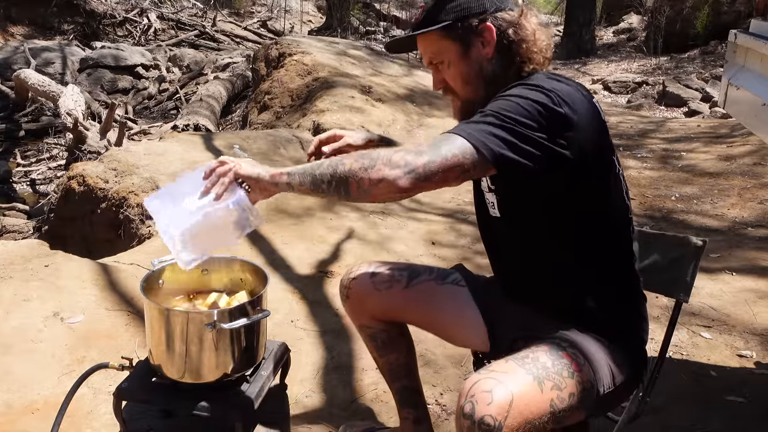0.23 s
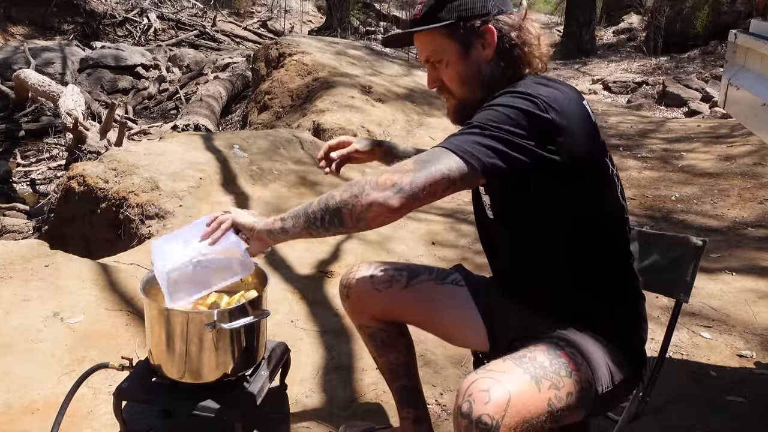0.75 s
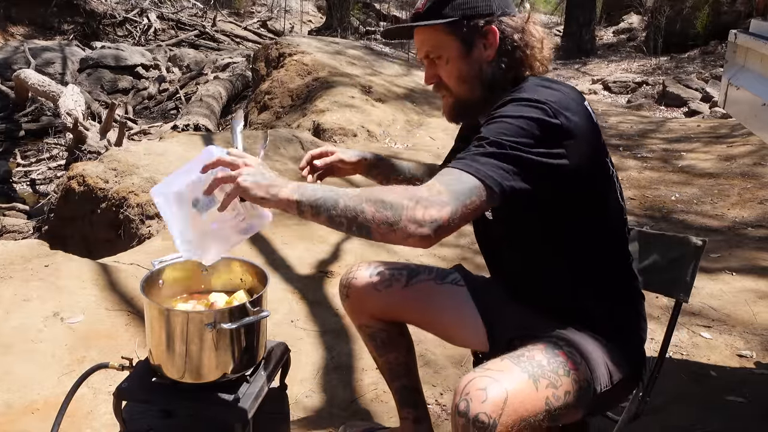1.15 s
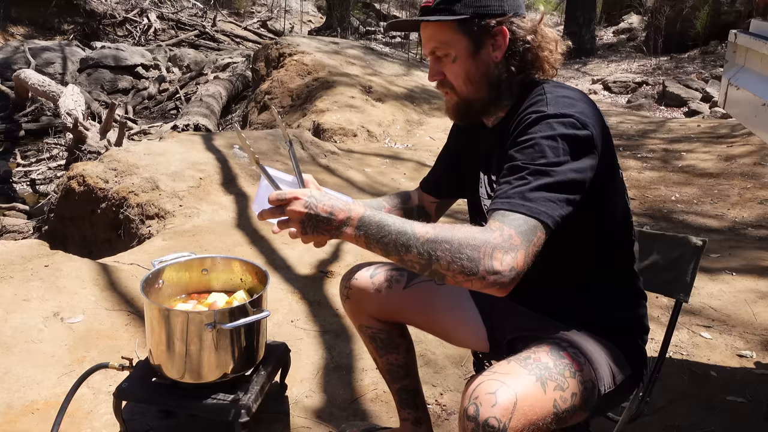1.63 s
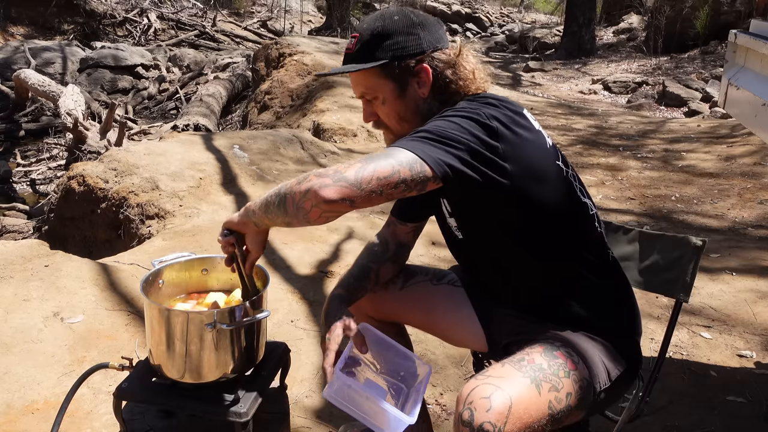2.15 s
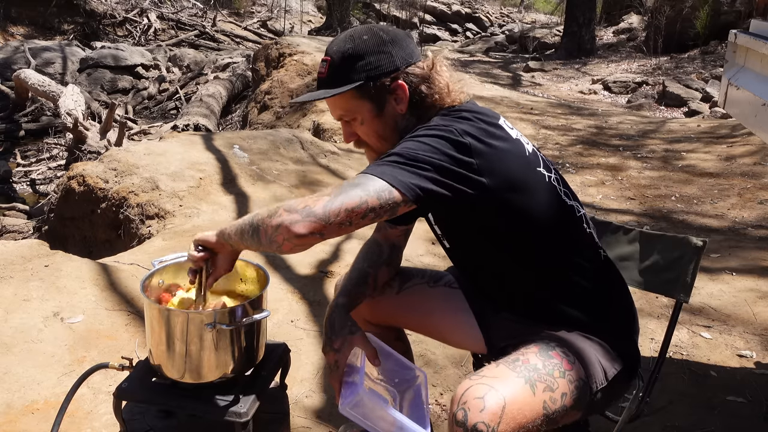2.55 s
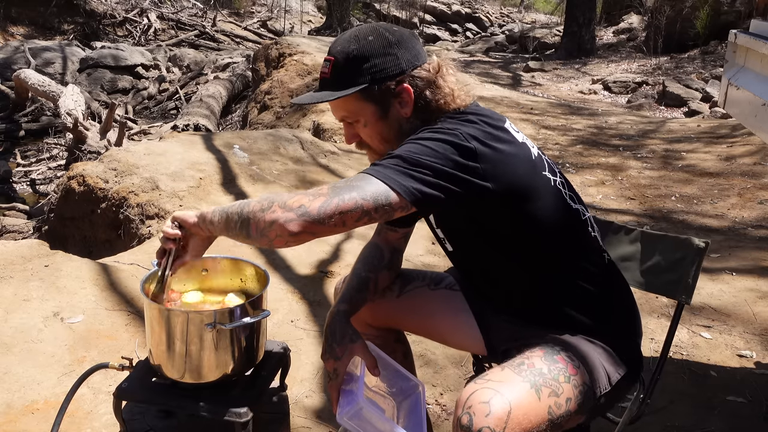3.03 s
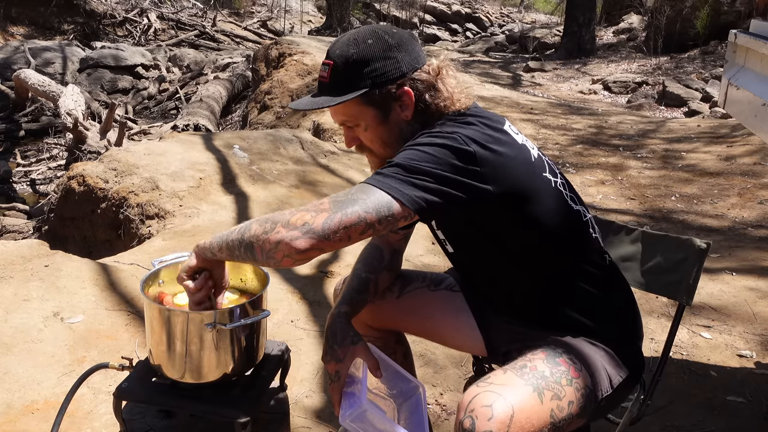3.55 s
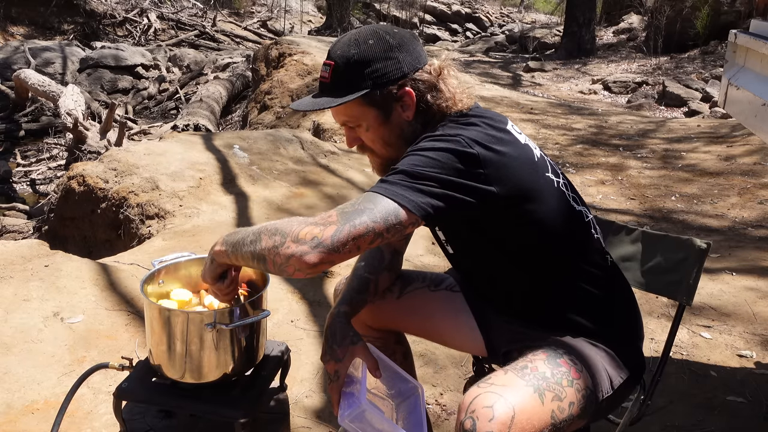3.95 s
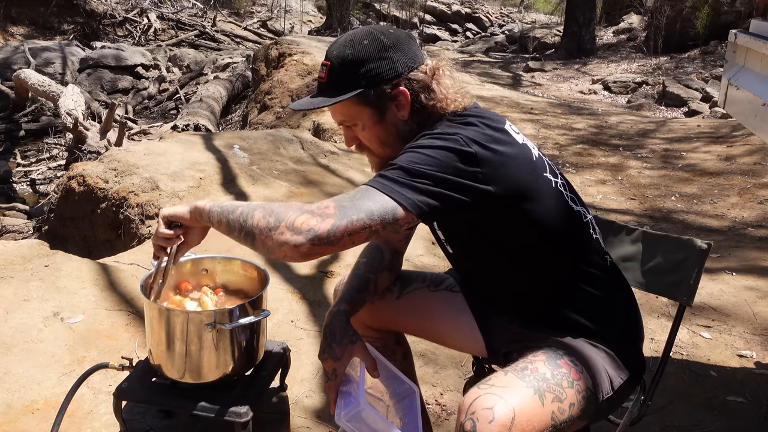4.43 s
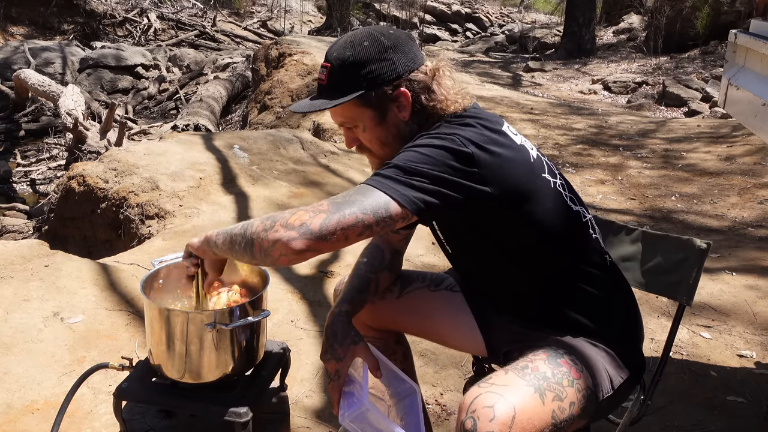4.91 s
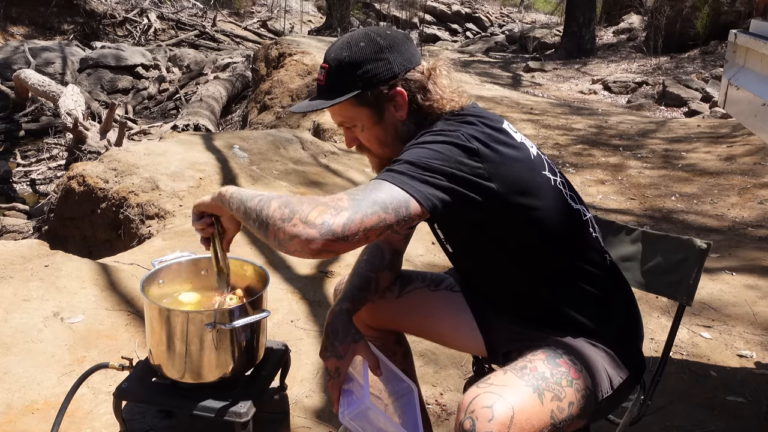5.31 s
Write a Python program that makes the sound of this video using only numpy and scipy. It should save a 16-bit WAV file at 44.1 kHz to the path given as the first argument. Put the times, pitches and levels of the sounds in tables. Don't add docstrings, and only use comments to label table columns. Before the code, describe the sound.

Close stereo sound at a dry outdoor camp, with almost no echo. Small plastic ticks and food scuffs come in the first 0.3 seconds. At 0.6 a tub corner rattles on a steel pot rim, then at 0.64 a hard knock rings the plastic with a short hollow boom; a softer, duller knock follows at 0.98. Light handling scuffs continue, with a faint bump at 1.7. Metal tongs clack on the pot wall at 2.14, with lesser taps to 2.4, again at 3.1, then a busy patch of scraping and ticking from 3.2 to 3.7. A bright, loud clack lands at 4.5, small drops plip around 4.85 to 5.05, and a last clack comes at 5.5. Throughout, a gas burner roars softly and flutters, strongest near 1.1, low wind rumbles and gradually eases, and to the right a cicada ticks and buzzes about six times a second over a faint high insect drone.

```python
import sys
import numpy as np
from scipy import signal
from scipy.fft import rfft, irfft
from scipy.io import wavfile
from scipy.ndimage import uniform_filter1d

SR = 44100
rng = np.random.default_rng(int(sys.argv[2]) if len(sys.argv) > 2 else 0)


def level_to_linear(level):
    exponent = np.asarray(level, float) / 20
    return 10 ** exponent


def transcribe(u):
    v = np.clip(np.atleast_2d(u).T, -1, 1)
    q = np.round(v * 32767).astype(np.int16)
    wavfile.write(sys.argv[1], SR, q)


N = 246078


def evened(x):
    return x / np.sqrt(np.mean(x ** 2) + 1e-20)


def peaked(x, db):
    return level_to_linear(db) * x / (abs(x).max() + 1e-20)


def read(points, hz):
    f, value = np.transpose(points)
    return np.interp(np.log(hz + 1), np.log(f + 1), value)


def curve(table, column):
    rows = np.array(table)
    return np.interp(np.arange(N) / SR, rows[:, 0], rows[:, column])


def add(mix, s, sound):
    part = mix[round(s * SR):][:len(sound)]
    part += sound[:len(part)]


def coloured(x, gain):
    return irfft(rfft(x) * gain(np.fft.rfftfreq(x.shape[-1], 1 / SR)), x.shape[-1])


def resonances(peaks):
    return lambda hz: sum(level_to_linear(db) / (1 + (2 * (hz - f) / w) ** 2) for f, w, db in peaks)


def blows(events, modes, spread_db, rough_db, crack_t60, shimmer_db, low_hz=250):
    # (frequency [Hz], density [dB per Hz])
    crack_spectrum = [(180, -31), (300, -8.5), (1530, -7.5), (2140, -4.5), (3030, -1.5), (4990, 0.5),
                      (6100, 2.5), (8090, -1.5), (16000, -15)]
    out, t = np.zeros(N), np.arange(8192) / SR
    hz, db, t60 = np.transpose(modes)[:, :, None]
    for s, peak_db, ring, crack_db, dull_db in events:
        spot, phase = rng.standard_normal((2, len(modes), 1))
        wobble = evened(uniform_filter1d(rng.standard_normal((len(modes), len(t))), size=70, axis=1))
        level_db = db + spread_db * spot + rough_db * wobble - 60 * t / (ring * t60)
        rise = np.minimum(hz * t / 4, 1)
        body = (level_to_linear(level_db) * rise * np.sin(2 * np.pi * hz * t + 2 * phase)).sum(0)

        snaps = np.exp(-(t % .0019) / 0.00019 - t / .002)
        chatter = rng.standard_normal(len(t)) * (0.35 + 3.2 * snaps)

        def contact(f):
            tilted = level_to_linear(read(crack_spectrum, f) - dull_db * np.log2(f + 400))
            return tilted / (1 + (low_hz / (f + 1)) ** 4)

        hiss = coloured(chatter, contact)
        shimmer = level_to_linear(shimmer_db - 60 * t / 0.23 + 3.8 * wobble[0])
        shimmer = shimmer * coloured(hiss, lambda f: 1 / (1 + (f / 7500) ** 3))
        crack = peaked(hiss * level_to_linear(-60 * t / (ring * crack_t60)) + shimmer, crack_db)
        onset = np.minimum(t / 0.00035, 1)
        add(out, s + 0.00037, peaked((peaked(body, 0) + crack) * onset, peak_db))
    return out


def tub_knocks():
    # (time [s], peak [dB], ring [factor on t60], crack [dB], dullness [dB per octave])
    knocks = [
        (.6373, -14, 1.01, -1, 1.6),
        (.9779, -23, .7, 1, 1.5),
        (.705, -33, .7, -4, 4.5),
        (1.681, -42, .5, -3, 5.5),
    ]
    # (frequency [Hz], level [dB], t60 [s])
    hard_modes = [(292, -11.5, 0.15), (740, 8, 0.018), (1060, -20.5, 0.21), (1135, 1, 0.043),
                  (1494, -7.5, 0.11), (1870, -20.5, 0.14), (2150, -16, 0.042), (2610, -17, 0.082),
                  (3410, -29, 0.035), (6850, -7, 0.019), (4150, -32, 0.052), (7900, -25.5, 0.058),
                  (9200, -23, 0.052), (9850, -22.5, 0.063)]
    # (frequency [Hz], level [dB], t60 [s])
    soft_modes = [(248, -1, 0.088), (774, 7, 0.025), (1143, 1.5, 0.04), (1500, -1, 0.038),
                  (1800, -10.5, 0.054), (2115, -15, 0.061), (2656, -17, 0.12), (3260, -20, 0.052),
                  (4460, -17, 0.023), (6450, -9.5, 0.032), (7500, -16, 0.035)]
    tub = blows(knocks[:1], hard_modes, spread_db=0.0, rough_db=3.5, crack_t60=0.08, shimmer_db=-20)
    tub += blows(knocks[1:], soft_modes, spread_db=.7, rough_db=3.0, crack_t60=0.06, shimmer_db=-18)
    return coloured(tub + booms(), lambda f: 1 / (1 + (150 / (f + 1)) ** 4))


def booms():
    # (time [s], peak [dB], frequency [Hz], t60 [s], stilled after [s])
    swings = [(.6409, -8.5, 466, .04, .03), (.6495, -20, 464, .2, .016), (.9818, -17, 478, .13, .011),
              (.6415, -24, 590, .08, .025), (.6378, -19, 1040, .06, .03), (.979, -44, 1486, .12, .03),
              (.672, -32, 470, .06, .02), (.707, -33, 460, .04, .02), (.999, -39, 500, .05, .012),
              (1.683, -44, 310, .06, .02)]
    out, t = np.zeros(N), np.arange(4096) / SR
    for s, peak_db, hz, t60, stilled in swings:
        hand = np.minimum(t / .0006, 1) / (1 + np.exp((t - stilled) / .002))
        add(out, s, peaked(-np.sin(2 * np.pi * hz * t) * level_to_linear(-60 * t / t60) * hand, peak_db))
    return out


def rim_glances():
    # (time [s], peak [dB], ring [factor on t60], crack [dB], dullness [dB per octave])
    glances = [
        (.5976, -19, .9, 4, .3),
        (.5997, -17, .9, 3, .5),
        (.613, -27, 1.2, 3, 3.5),
        (.618, -26, 1.01, 3, 2.5),
        (.629, -31, 1.01, -3, 1.5),
    ]
    # (frequency [Hz], level [dB], t60 [s])
    rim = [(1000, -4, 0.036), (1466, -16, 0.33), (1740, -9.5, .06), (2115, -1.5, 0.02), (2630, -9, 0.047),
           (3470, -12.5, 0.036), (4540, 1, 0.021), (5150, -21, .06), (5870, -11, .06), (6650, 5, 0.029),
           (7330, -5, 0.06), (8100, -13, 0.044), (9840, -11, 0.032), (11720, -20, 0.054)]
    return blows(glances, rim, spread_db=1.0, rough_db=3.0, crack_t60=0.07, shimmer_db=-11)


def tong_clacks():
    # (time [s], peak [dB], ring [factor on t60], crack [dB], dullness [dB per octave])
    clacks = [(2.1442, -16.5, 0.98, 1.5, 1.5), (2.1628, -25.5, 0.63, -6, -1), (2.2342, -27.5, 1.1, 12, 6),
              (2.372, -26, 0.77, 7, 0), (3.086, -21, 0.86, 1, 0.5), (3.412, -31, 1.2, 12, 4),
              (4.4805, -12.5, 0.87, 7, -4), (4.4967, -26.5, 0.74, 12, 3), (5.515, -15.5, 0.65, 5, -4.5),
              (5.5325, -25.5, 0.95, 8, 2)]
    landings = [0, 0, 0, 0, 1, 1, 2, 2, 3, 3]
    # (frequency [Hz], level [dB], t60 [s])
    first = [(730, -12, 0.062), (2126, -3.5, 0.043), (2570, -13, 0.045), (3435, -11, 0.028),
             (3890, -3.5, 0.028), (4400, -6, .02), (4840, 5, 0.013), (5300, 0.5, 0.018),
             (5900, -9.5, 0.034), (6940, -4, 0.02), (7700, -3, 0.023), (8100, -7, 0.02), (8570, -4, 0.036),
             (12050, -14, 0.014)]
    second = [(2160, -5, 0.03), (2412, -7, 0.028), (3350, -9.5, .02), (3790, -4.5, 0.035), (4400, 1, 0.02),
              (4730, -0.5, 0.023), (5090, -6, 0.034), (5550, 1, 0.021), (6230, -6, 0.027),
              (6780, -13, 0.04), (7330, -6, 0.022), (8260, -10, 0.03), (11400, -7, 0.012),
              (13100, -13, 0.013)]
    third = [(707, -11.5, 0.019), (1113, -29.5, 0.057), (2164, -8.5, 0.044), (2580, -30, 0.045),
             (4400, -5, 0.025), (4960, 0, 0.014), (5380, -5.5, 0.019), (5270, -18, 0.029), (6500, -8, 0.03),
             (6900, -14, 0.033), (7300, -24, 0.072), (8030, -11, 0.025), (8800, -16, 0.025),
             (9270, -25, 0.031)]
    fourth = [(409, -16, 0.056), (730, -15, 0.065), (1070, -24, 0.036), (2102, 0.5, 0.041),
              (2720, -33, 0.041), (3160, -22, 0.12), (3650, -10.5, 0.039), (4640, -1.5, 0.029),
              (6000, -13, 0.051), (6500, 0.5, 0.018), (7770, 0.5, 0.022), (8100, -23, 0.025),
              (8800, -8, 0.021), (9070, -8.5, 0.028)]
    out = np.zeros(N)
    for clack, spot in zip(clacks, landings):
        wall = (first, second, third, fourth)[spot]
        out += blows([clack], wall, spread_db=.7, rough_db=2.6, crack_t60=0.028, shimmer_db=-9, low_hz=1550)
    return out


def ticks():
    # (time [s], peak [dB], centre [Hz])
    scuffs = [(.051, -34, 3800), (.11, -45, 2500), (.129, -46, 1800), (.188, -37, 2600), (.2, -41, 3800),
              (.26, -45, 1100), (.5, -39, 2000), (.61, -33, 300), (.6374, -20, 1400), (.963, -44, 2500),
              (.978, -32, 300), (1.1295, -44, 1800), (1.2453, -48, 900), (1.3726, -41, 3000),
              (1.682, -48, 890), (1.7642, -38.5, 1900), (1.794, -44, 1300), (1.93, -48, 2000),
              (3.186, -46, 1600), (3.4, -46, 580), (3.64, -33, 2600), (3.657, -35, 2500),
              (4.8444, -37, 1040), (4.9048, -46, 1210), (5.517, -36.5, 520)]
    # (time [s], peak [dB], centre [Hz])
    dry_ticks = [(0.06, -50, 8850), (0.108, -36, 4860), (0.128, -50, 1800), (0.14, -42.5, 2600),
                 (.101, -49, 7500), (0.202, -38.5, 1840), (0.341, -45, 5900), (0.352, -44, 5500),
                 (.62, -49, 8100), (2.3028, -38.5, 4130), (2.3255, -51, 5240), (2.423, -42, 1000),
                 (2.4622, -37, 4900), (3.233, -40, 5430), (3.257, -38, 6150), (3.35, -40, 4200),
                 (3.499, -39, 4600), (3.534, -43, 4270), (3.552, -39, 4500), (3.604, -43, 4400),
                 (3.147, -50, 7500), (3.3808, -47, 1400), (3.419, -40, 4500), (3.478, -43, 6500),
                 (3.682, -44.5, 694), (4.511, -46, 730), (5.001, -43, 4130)]
    # (time [s], peak [dB], centre [Hz])
    taps = [(2.445, -43, 6300), (2.213, -60, 4800), (0.05, -21.5, 4400), (2.459, -47, 1270),
            (0.245, -42.5, 1780), (.2594, -49, 2190), (1.821, -46, 1620), (1.895, -39.5, 670),
            (2.3902, -40, 4370), (3.16, -52, 2650), (3.245, -50, 2500), (2.332, -48, 2800),
            (2.312, -47, 5200), (3.1767, -41, 6600), (3.2096, -40, 6200), (3.456, -42, 2720),
            (3.501, -43.5, 1500), (3.563, -36, 5200), (3.582, -34, 5460), (3.6226, -44, 4800),
            (3.627, -34, 4960), (3.865, -42, 4620), (4.526, -40, 4930), (4.6985, -45.5, 5240),
            (5.026, -45, 3800), (5.093, -43.5, 6300), (5.094, -45, 3560)]
    # (time [s], peak [dB], centre [Hz])
    snaps = [(2.294, -50, 12000), (2.464, -46, 12000), (3.257, -46, 12500), (0.0769, -24.5, 11000),
             (.141, -50, 11000), (.19, -41, 10000), (4.369, -48, 10840), (4.447, -44, 11000),
             (5.197, -45, 11500), (5.404, -47, 10500), (5.468, -48, 10500), (5.568, -46, 11500),
             (.199, -44, 12500), (2.164, -38, 12500), (5.311, -50, 12000)]
    # (time [s], peak [dB], centre [Hz])
    pricks = [(.0065, -36.5, 3000), (.6376, -17, 4000), (.9782, -28, 5000), (.3425, -40, 5000),
              (1.2465, -43, 3000), (2.462, -40, 5000), (3.082, -48, 4700), (0.051, -26.5, 7500),
              (0.0577, -31, 9000), (.0625, -34, 8000), (0.1774, -36, 6000), (0.1876, -32, 5000),
              (0.5015, -50, 3020), (.312, -56, 9000), (.457, -57, 9500), (1.246, -55, 1500),
              (3.4112, -36, 6860), (3.425, -39, 6500), (3.475, -37, 4950), (3.5014, -42.5, 3500),
              (3.5555, -44, 5000), (3.5612, -35, 4170), (3.5812, -27, 5570), (3.597, -51, 7950),
              (3.6055, -38, 4500), (3.6362, -35, 7000), (3.6383, -29.5, 5130), (3.641, -32, 3570),
              (3.6435, -35, 4000), (3.648, -37, 4000), (3.6567, -38, 4000), (3.6623, -50, 3000),
              (3.674, -45, 4000), (4.235, -47.5, 4000), (2.303, -50, 7700), (2.43, -44, 5000),
              (2.493, -45, 3000), (.674, -40, 6500), (.266, -45, 4800), (4.5065, -37, 5000),
              (5.5215, -32, 4970), (5.442, -42, 7500), (3.257, -36, 6500), (3.177, -42, 4000),
              (2.455, -45, 5000), (.38, -47, 5000), (.1015, -44, 8000), (5.345, -46, 5800),
              (3.251, -45, 5500)]
    # (bandwidth [octaves], t60 [s])
    contacts = [
        (1, 0.065),
        (0.5, 0.046),
        (0.27, 0.039),
        (.42, 0.0048),
        (0.45, 0.013),
    ]
    out, t = np.zeros(N), np.arange(-64, 4032) / SR
    for events, (octaves, t60) in zip((scuffs, dry_ticks, taps, snaps, pricks), contacts):
        for s, peak_db, hz in events:
            fade = level_to_linear(-60 * t / t60) + 0.5 * np.exp(-t / 0.00068)
            burst = rng.standard_normal(len(t)) * fade * (t > 0)
            band = coloured(burst, lambda f: np.exp(-.5 * (np.log2((f + 1) / hz) / octaves) ** 2))
            add(out, s + .0005 + t[0], peaked(band, peak_db))
    return out


def rubbing():
    # (time [s], level [dB])
    rub = [(0.0, -50), (0.37, -59), (1.18, -61), (1.62, -63), (2.22, -57.5), (2.33, -53), (2.84, -61),
           (3.12, -63), (3.26, -54), (3.4, -52.5), (3.64, -47.5), (3.73, -54), (4.32, -65), (4.58, -57),
           (4.68, -62.5), (4.99, -56.5), (5.13, -60.5), (5.58, -83)]
    # (frequency [Hz], density [dB per Hz])
    grit = [(290, -60), (500, -49.5), (750, 4.5), (974, -3), (2160, 2), (2390, 2.5), (5470, 3),
            (8450, -0.5), (14700, -18), (16000, -16)]
    grains, t = np.zeros(N), np.arange(600) / SR
    for hz in np.geomspace(900, 9000, 16):
        slips = level_to_linear(2.9 * np.minimum(rng.exponential(1, N), 4)) * (rng.random(N) < 160 / SR)
        cycles = rng.uniform(2, 7)
        squeak = np.sin(2 * np.pi * hz * t) * np.exp(-t * hz / cycles)
        grains += signal.oaconvolve(slips, squeak)[:N] * np.sqrt(hz / cycles)
    pressure = evened(uniform_filter1d(rng.standard_normal(N), size=600))
    rough = .9 * evened(grains) + rng.standard_normal(N) * level_to_linear(2.2 * pressure)
    return level_to_linear(curve(rub, 1) - 4.5) * evened(coloured(rough, lambda f: level_to_linear(read(grit, f))))


def drips():
    # (time [s], peak [dB], bubble [Hz], rise [share], t60 [s])
    drops = [
        (4.85, -45, 990, 0.061, 0.057),
        (4.876, -38.5, 2250, 0.3, 0.042),
        (4.915, -48, 1230, 0.082, 0.027),
        (4.925, -48, 1164, 0.08, 0.028),
        (4.986, -48.5, 1520, 0.087, 0.024),
        (5.049, -54.5, 2470, 0.074, 0.066),
        (5.573, -48, 1850, 0.04, 0.015),
    ]
    out, t = np.zeros(N), np.arange(4096) / SR
    for s, peak_db, hz, rise, t60 in drops:
        turns = hz * (t + rise * t ** 2 / t60)
        envelope = level_to_linear(-60 * t / t60) * np.minimum(t / 0.00086, 1)
        add(out, s, peaked(np.sin(2 * np.pi * turns) * envelope, peak_db))
    return out


def clearing(x):
    t = np.arange(6000) / SR
    sparse = rng.random((2, len(t))) < .05
    echoes = rng.choice([-1., 1.], (2, len(t))) * sparse * level_to_linear(-60 * t / 0.045) * (t > .0006)
    tail = coloured(echoes, lambda f: (f / 2000 + 0.048) ** 0.1)
    return signal.fftconvolve(x[None], tail / np.linalg.norm(tail[0]), axes=1)[:, :N]


def burner():
    # (time [s], level [dB])
    breeze_curve = [(0, -49), (.28, -57.5), (.5, -60), (.75, -53), (.98, -53.5), (1.12, -46.5),
                    (1.55, -52.5), (1.72, -59), (1.86, -57), (1.93, -51), (2.3, -63), (2.45, -56.5),
                    (2.62, -64.5), (2.83, -60), (3.1, -63), (3.96, -69.5), (4.45, -64), (5.58, -75.5)]
    # (frequency [Hz], width [Hz], level [dB])
    air_space = [(573, 190, 5), (770, 158, 3), (358, 690, -9), (2090, 200, -12)]
    # (frequency [Hz], width [Hz], level [dB])
    stand = [(1430, 140, -1.5), (1234, 1200, -18)]
    flutter = evened(uniform_filter1d(rng.standard_normal(N), size=700))
    flame = rng.standard_normal((2, N))
    flame = (flame[0] + 0.29 * flame[:, ::-1]) * level_to_linear(3.06 * flutter)
    breeze = curve(breeze_curve, 1) + 58
    roar = level_to_linear(-59 + breeze) * evened(coloured(flame, resonances(air_space)))
    whistle = level_to_linear(-72.5 + 1.03 * breeze) * evened(coloured(flame, resonances(stand)))
    return roar + whistle


def cicada():
    # (frequency [Hz], width [Hz], level [dB])
    tymbal = [(8010, 430, 5.5), (8670, 350, 6.5), (6840, 590, 0), (4360, 550, -3.5)]
    # (frequency [Hz], width [Hz], level [dB])
    tick_body = [(7640, 1200, 6), (4500, 600, -1), (11200, 1800, -15.5)]
    clicks, buzz, sag, t = np.zeros(N), np.zeros(N), np.zeros(N), np.arange(7000) / SR
    swell = (1 - np.exp(-t / 0.00084)) * np.exp(-t / 0.06) * np.clip((t[-1] - t) / .03, 0, 1)
    for s, tick_db, buzz_db, delay in phrases():
        tick = rng.standard_normal(200) * np.exp(-t[:200] / 0.0011)
        tick = 0.35 * tick + 2.4 * (t[:200] == 0)
        add(clicks, s + .0005, level_to_linear(tick_db) * tick)
        add(clicks, s + delay, level_to_linear(tick_db - 5.0) * tick)
        add(buzz, s, level_to_linear(buzz_db) * swell)
        add(sag, s, 550 * np.exp(-t / .028))
    turns = np.cumsum(350 * (1 + 0.71 * uniform_filter1d(rng.standard_normal(N), size=300))) / SR
    pulsed = rng.standard_normal((2, N)) * (0.27 + np.exp(-(turns % 1) / 0.15))
    wide = pulsed[0] + 0.14 * pulsed[1] * np.array([[1], [-1]])
    song = signal.hilbert(coloured(wide, resonances(tymbal)))
    song = evened((song * np.exp(-2j * np.pi * np.cumsum(sag) / SR)).real)
    ticking = level_to_linear(12) * coloured(clicks, resonances(tick_body))
    return (ticking + buzz * song) * level_to_linear(np.array([[-4.5], [2.5]]))


def phrases():
    # (time [s], effort [dB])
    song = [(0.0112, -2.5), (0.506, -0.5), (0.8483, -4), (2.1524, -4.5), (2.811, -3), (3.3117, -4),
            (4.3042, -5.5), (4.9594, -5), (5.454, -5.5)]
    marked = [0, 3, 5, 13, 17, 20, 26, 30, 33]
    start, effort = (np.interp(np.arange(marked[-1] + 1), marked, c) for c in np.transpose(song))
    a, b, c = rng.standard_normal((len(start), 3)).T
    uneven_db = .8
    tick_db = -38 + 1.8 * effort + uneven_db * a
    buzz_db = -52 + effort + uneven_db * b
    return zip(start, tick_db, buzz_db, 0.022 * (1 + 0.21 * c))


def field(points, patchy_db, size):
    # (frequency [Hz], likeness [0-1])
    likeness = [(60, 0.28), (150, 0.66), (380, 0.51), (950, 0.073), (2380, 0.64), (5980, 0.98),
                (15000, 0.97)]
    frames, hz = 4 * N // size + 6, np.fft.rfftfreq(size, 1 / SR)
    a, b, c, d, patch = rng.standard_normal((frames, len(hz), 5)).T
    patch = evened(uniform_filter1d(uniform_filter1d(patch, size=10, axis=0), size=10, axis=1))
    same, left = np.clip(read(likeness, hz), -1, 1)[:, None], a + 1j * b
    right = same * left + np.sqrt(1 - same ** 2) * (c + 1j * d)
    z = np.array([left, right]) * level_to_linear(read(points, hz)[:, None] + patchy_db * patch)
    return evened(signal.istft(z, nperseg=size, noverlap=3 * size // 4)[1][:, :N])


def wind():
    # (time [s], level [dB])
    gusts = [(0.0, -63.5), (0.59, -65), (0.7, -62.5), (0.93, -68), (1.15, -59), (1.46, -60.5),
             (1.69, -68.5), (2.1, -65.5), (2.42, -70), (2.75, -67.5), (3.22, -72.5), (3.65, -69),
             (4.01, -76), (4.49, -69.5), (4.68, -68), (4.86, -76), (5.05, -73), (5.58, -75)]
    # (frequency [Hz], density [dB per Hz])
    rumble = [(15, -64), (25, -23), (38, -19.5), (107, 2.5), (168, 4), (264, 5.5), (365, -5.5), (500, -35),
              (650, -25), (1100, -120)]
    return level_to_linear(6 + curve(gusts, 1)) * field(rumble, patchy_db=1.5, size=2048) * level_to_linear(np.array([[1.3], [-1.3]]))


def air():
    # (frequency [Hz], density [dB per Hz])
    hiss = [(24, -42), (40, -14), (199, 0), (733, -1.5), (1120, -6), (1410, -4), (1630, -9), (2100, -6),
            (3380, -11.5), (6490, -10.5), (7600, -7), (8800, -10.5), (9500, -19), (14800, -23),
            (16000, -33.5)]
    # (frequency [Hz], spread [dB])
    mottle = [(300, 2.5), (1500, 2), (3000, 1.3), (5500, 1.5), (7000, 3.5), (9000, 2.5), (10000, .8)]
    patchy_db = read(mottle, np.fft.rfftfreq(1024, 1 / SR))[:, None]
    return level_to_linear(-60.5) * field(hiss, patchy_db=patchy_db, size=1024)


def scene():
    pot = tub_knocks() + rim_glances() + tong_clacks() + ticks() + rubbing() + drips()
    around = burner() + wind() + cicada() + air()
    return pot * level_to_linear(np.array([[.2], [-.2]])) + level_to_linear(-15.5) * clearing(pot) + around


def band_limit(x):
    return signal.sosfilt(signal.butter(12, 16670, fs=SR, output="sos"), x)


def record(dry):
    heard = coloured(dry, lambda f: 1 / (1 + (55 / (f + 1)) ** 3) / (1 + (f / 16100) ** 90))
    return band_limit(heard)


dry = scene()
out = record(dry)
transcribe(out)
```